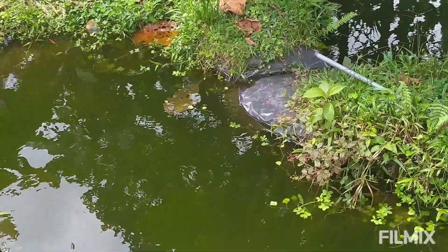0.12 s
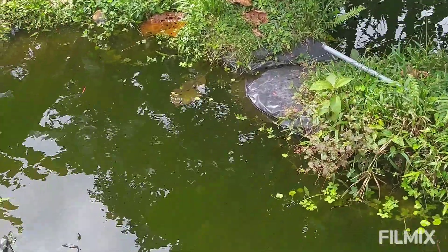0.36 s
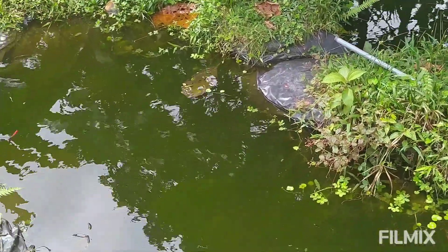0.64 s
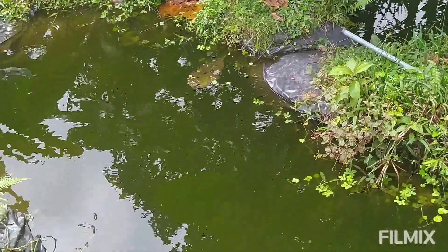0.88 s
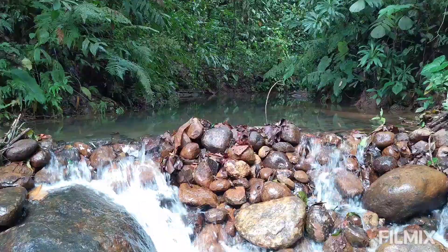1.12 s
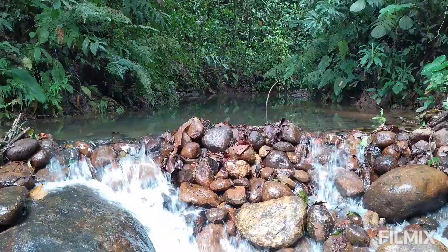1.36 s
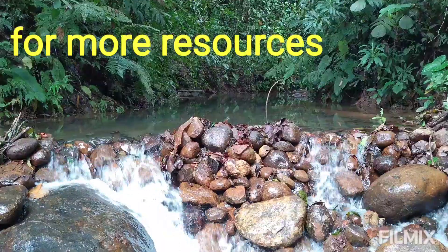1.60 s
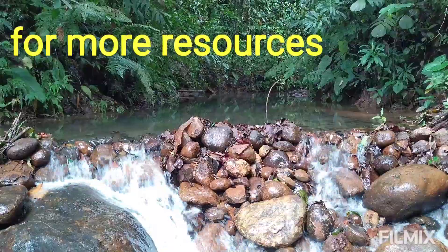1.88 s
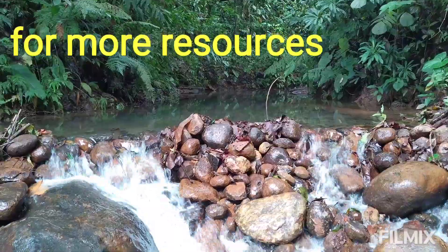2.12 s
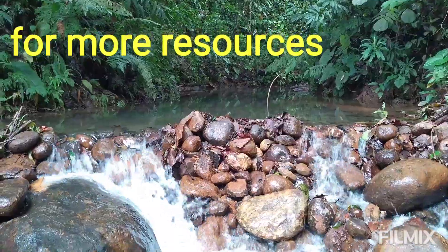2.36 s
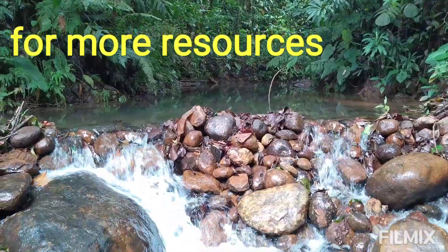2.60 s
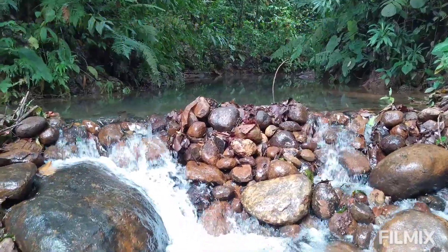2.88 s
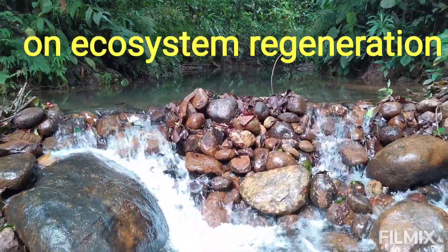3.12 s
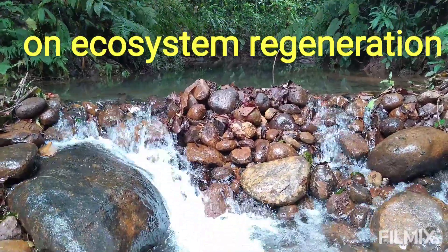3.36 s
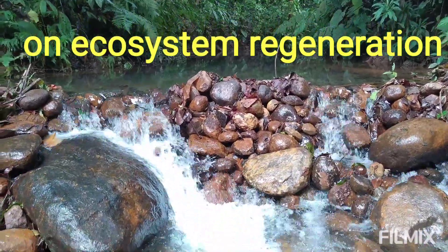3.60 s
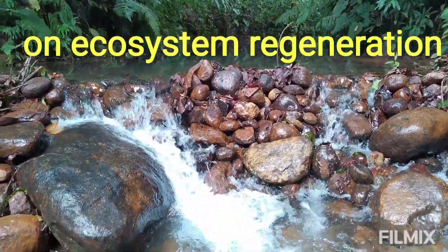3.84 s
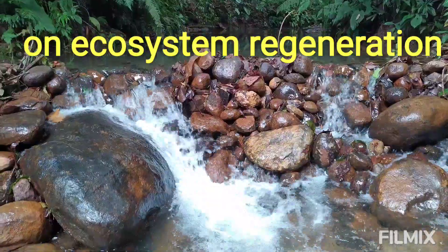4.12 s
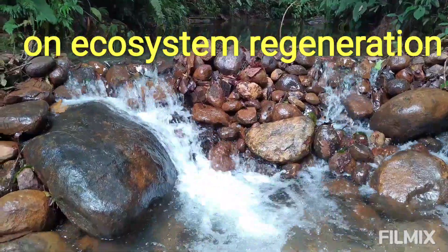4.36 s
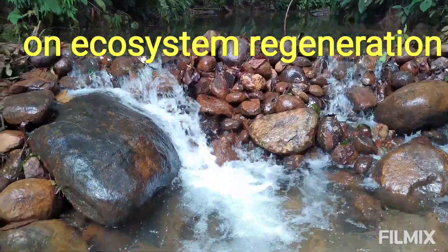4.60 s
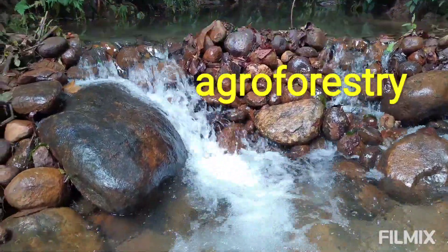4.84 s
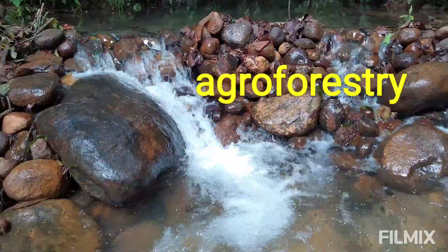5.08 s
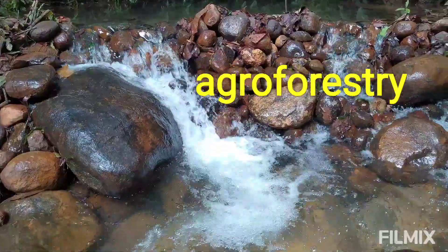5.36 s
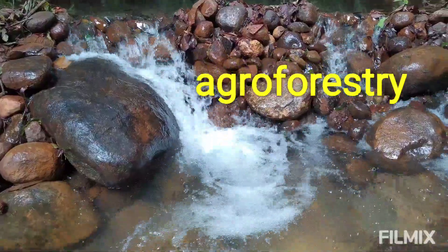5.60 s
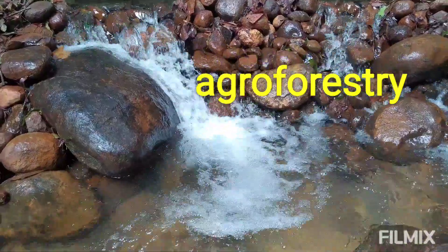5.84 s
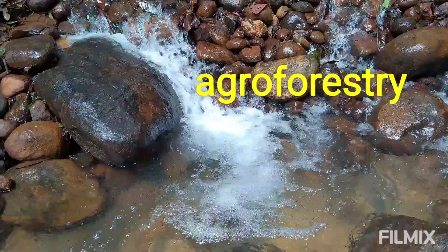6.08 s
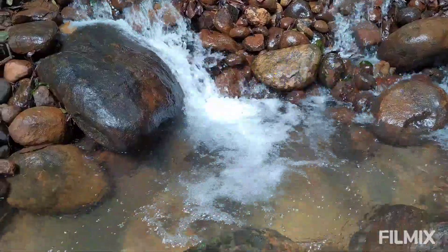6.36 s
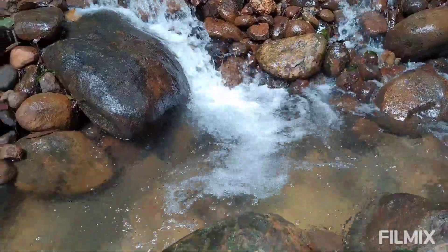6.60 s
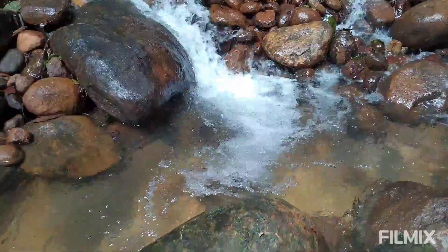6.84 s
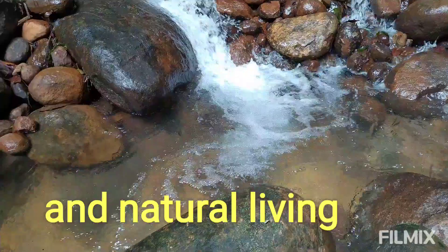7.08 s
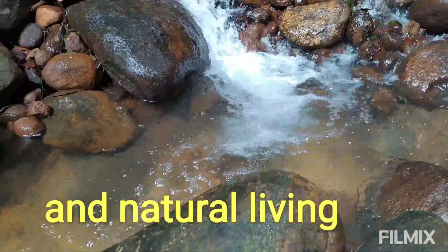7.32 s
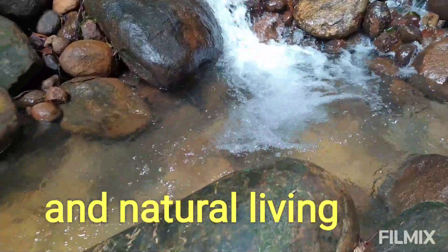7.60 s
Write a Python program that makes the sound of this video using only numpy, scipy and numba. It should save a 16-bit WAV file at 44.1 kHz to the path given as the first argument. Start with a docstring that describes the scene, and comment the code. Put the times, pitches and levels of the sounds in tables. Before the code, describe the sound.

Low gusty wind thumps fade away, a short gap follows, and a bright, splashing brook fades up and runs steadily with gurgling bubbles.

```python
"""Wind buffets two microphone ports beside a still pond and fades out; after a short silence
a shallow stream fades in, rushing over stones: a broad wash, bubbles in the plunge pool, fine spray.
Wind, faint air and wash are filtered noise that swells and flickers by chance.
Puffs, bubbles and spray drops are short dying sines whose pitch slides a little."""
import sys
import numpy as np
from scipy import signal
from scipy.fft import rfft, irfft, next_fast_len
from scipy.io import wavfile
from numba import njit

SR = 44100
rng = np.random.default_rng(int(sys.argv[2]) if len(sys.argv) > 2 else 0)


def unload_audio(sound):
    """Save the sound as a 16-bit wav file, at the path given as the first command line argument."""
    columns = np.transpose(np.atleast_2d(sound))
    # keep every value between -1 and 1, then stretch to whole-number steps
    steps = np.round(np.clip(columns, -1, 1) * 32767)
    wavfile.write(sys.argv[1], SR, steps.astype(np.int16))


def boost_factor(decibels):
    """Convert a level in decibels to a linear amplitude factor."""
    exponent = np.asarray(decibels, float) / 20
    return 10 ** exponent


N = 340011   # length in samples

# Tone of the wind. Each row: pitch in Hz, relative level in dB per Hz.
WIND_COLOUR = [(8.8, -29), (15, 7.5), (80, 2), (258, -11), (356, -21), (418, -31), (541, -32), (700, -44),
               (910, -73), (1540, -120)]
# Gusts, before the fade. Each row: middle in seconds, rumble level in dB, half length in seconds,
# left against right in dB.
GUSTS = [(0.013, -33.5, 0.035, 4), (0.102, -33.5, 0.018, -9), (0.197, -32, 0.015, -16),
         (0.27, -43, 0.0097, -10), (0.402, -37.5, 0.031, 1), (0.56, -33.5, 0.038, 2),
         (0.68, -42.5, 0.03, -5), (0.857, -38, 0.027, -4)]
# Sudden puffs, mostly on one port. Each row: start in seconds, strength in dB, starting pitch in Hz,
# left against right in dB.
PUFFS = [(0.095, -42, 178, -10.5), (0.187, -24.5, 270, -16), (0.37, -39, 167, 11), (0.495, -40, 186, -16.5),
         (0.544, -37, 151, 1.0), (0.835, -44.5, 188, -18), (1.044, -53, 186, -19)]
# Tone of the faint air by the pond. Each row: pitch in Hz, relative level in dB per Hz.
AIR_COLOUR = [(240, -41), (400, -25), (539, -16), (683, -16), (893, -18), (1850, -18), (2530, -17.5),
              (2770, -21), (6460, -26.5), (9090, -17.5), (14000, -31)]
# Tone of the stream's wash. Each row: pitch in Hz, relative level in dB per Hz.
WASH_COLOUR = [(15, -61), (25, -30.5), (101, -22.5), (165, -4), (447, -6.5), (525, -0.5), (771, -4.5),
               (886, -1), (1110, -5.5), (1280, -3.5), (1500, -6.5), (2190, -6.5), (2780, -9.5),
               (3020, -14.5), (3560, -15.5), (5620, -11.5), (7560, -15), (9640, -5.5), (11300, -8.5),
               (12500, -19.5), (15600, -31.5)]
# How wide the wash is. Each row: pitch in Hz, side against middle in dB.
WASH_WIDTH = [(60, 0), (110, -11), (200, -16.5), (380, -8.5), (700, -7.5), (1290, -1), (2380, -0.5),
              (4400, 0), (8120, 0.5), (15000, 1)]
# Which way the wash leans, before the turn. Each row: pitch in Hz, left against right in dB.
WASH_LEAN = [(60, -1), (110, -0.5), (200, 0.0), (380, -0.5), (700, -0.5), (1290, -2.5), (2380, 1.5),
             (4400, 0), (8120, -6.5), (15000, 10)]
# The microphones tilt down and turn to the pool. Each row: time in seconds, spray level in dB,
# left against right in dB.
TURN = [(1.3, 0.5, -0.2), (4.0, 0, -0.4), (6.0, 0.0, 0.0), (7.7, -2.0, 0.5)]
# The biggest bubbles, before the fade-in. Each row: start in seconds, strength in dB,
# starting pitch in Hz.
GULPS = [(2.027, -21, 977), (2.217, -20, 538), (3.359, -21, 594), (3.545, -23, 950), (4.104, -17.5, 397),
         (4.249, -18, 590), (4.507, -22, 800), (4.721, -20.5, 533), (5.018, -22.5, 544), (5.338, -22, 493),
         (6.395, -19, 1030), (7.012, -22, 624), (7.295, -22, 923), (7.444, -22, 686)]


def rms_one(x):
    """Scales a sound to an average power of 1."""
    return x / np.sqrt(np.mean(x ** 2) + 1e-20)


def sides(pan_db):
    """Left and right gains that differ by pan_db, half of it on each side."""
    return boost_factor(np.array([pan_db / 2, -pan_db / 2]))


def ramp(from_s, to_s):
    """Gain that rises from 0 to 1 in a straight line."""
    return np.interp(np.arange(N) / SR, [from_s, to_s], [0, 1])


def coloured(x, curve):
    """Filters a sound by a curve of (Hz, dB), read evenly in octaves."""
    size = next_fast_len(N)
    log_hz = np.log(np.arange(size // 2 + 1) * SR / size + 1)
    hz, db = np.transpose(curve)
    gain = boost_factor(np.interp(log_hz, np.log(hz), db))
    return irfft(rfft(x, size) * gain, size)[..., :N]


def drift(rate_hz):
    """Slow chance wandering with spread 1: noise smoothed twice, each time above rate_hz."""
    hop = 40   # samples between the points that are drawn
    r = np.exp(-2 * np.pi * rate_hz * hop / SR)
    noise = rng.standard_normal(N // hop + 2002)
    slow = signal.lfilter([1], [1, -2 * r, r * r], noise)[2000:]   # skip the settling
    slow = rms_one(slow - slow.mean())
    return np.interp(np.arange(N) / hop, np.arange(len(slow)), slow)


def patchy_noise(shared_db, own_db, fast_db):
    """Two white noises whose half-octave bands swell together, swell alone, and flicker."""
    size = next_fast_len(N)
    white = rfft(rng.standard_normal((2, size)))
    hz = np.arange(size // 2 + 1) * SR / size
    place = np.clip(2 * np.log2(hz / 40 + 1e-9), 0, 17)   # half octaves above 40 Hz
    together = drift(6.0)
    out = 0
    for k in range(18):
        overlap = np.clip(1 - abs(place - k), 0, 1)
        band = irfft(white * overlap, size)[:, :N]
        swell_db = shared_db * together + own_db * drift(3.6) + fast_db * drift(33.0)
        out = out + band * boost_factor(swell_db)
    return rms_one(out)


@njit
def add_rings(out, at, step, peak, cycles, rise):
    """Adds dying sines: the pitch climbs if rise is above 0 and sinks if it is below."""
    for k in range(len(at)):
        span = cycles[k] / step[k]   # samples in which the dying factor falls to 1/e
        for i in range(min(int(5 * span), out.shape[1] - at[k])):
            u = i / span
            sine = np.sin(2 * np.pi * step[k] * i * (1 + rise[k] * u))
            v = sine * np.exp(-u) * min(1.0, 4 * u)   # soft start
            out[0, at[k] + i] += peak[0, k] * v
            out[1, at[k] + i] += peak[1, k] * v


def tabled(rows, cycles, rise, pan_db):
    """Listed events, each a short dying sine."""
    s, db, hz = np.transpose(rows)[:3]
    out = np.zeros((2, N))
    same = np.ones(len(s))
    peak = boost_factor(db) * sides(pan_db * same)
    add_rings(out, (s * SR).astype(np.int64), hz / SR, peak, cycles * same, rise * same)
    return out


def swarm(per_s, low_hz, high_hz, cycles, rise, spread_db, pan_db):
    """Rings at random times: pitches even in octaves, a few far louder than the rest; power 1."""
    when, pitch, loudness, place, length = rng.random((5, int(per_s * N / SR)))
    hz = low_hz * (high_hz / low_hz) ** pitch
    peak = boost_factor(-spread_db * np.log(loudness + 0.0011)) * sides(pan_db * (2 * place - 1))
    out = np.zeros((2, N))
    # longer rings also climb faster
    add_rings(out, (when * N).astype(np.int64), hz / SR, peak, cycles * (0.5 + length), rise * length)
    return rms_one(out)


def wind():
    """Lumpy rumble of its own in each port: a steady breeze plus bell-shaped gusts."""
    s = np.arange(N) / SR
    level = boost_factor(-47)   # the steady breeze
    for at, db, half_s, pan_db in GUSTS:
        bell = np.exp(-0.5 * ((s - at) / half_s) ** 2)
        level = level + boost_factor(db) * sides(pan_db)[:, None] * bell
    lumps = boost_factor(3.0 * np.array([drift(25.4), drift(25.0)]))
    rumble = coloured(rng.standard_normal((2, N)), WIND_COLOUR)
    return level * rms_one(rumble * lumps)


def air():
    """Leaves and far water: faint patchy noise that slowly sinks."""
    s = np.arange(N) / SR
    hiss = rms_one(coloured(patchy_noise(shared_db=1.0, own_db=0.5, fast_db=1.0), AIR_COLOUR))
    return hiss * boost_factor(-53 - 2 * s)   # sinks by 2 dB each second


def puffs():
    """Sudden puffs of wind: low thumps that die quickly while their pitch sinks."""
    return tabled(PUFFS, cycles=1.4, rise=-0.04, pan_db=np.array(PUFFS)[:, 3])


def pond():
    """Wind and faint air fade out together; the puffs keep their strength."""
    fade_out = 1 - ramp(from_s=0.13, to_s=1.19)
    return fade_out * (wind() + air()) + puffs()


def wash():
    """Countless small bubbles blend into noise, wider in the treble."""
    mid, side = coloured(patchy_noise(shared_db=0.42, own_db=0.65, fast_db=1.59), WASH_COLOUR)
    side = coloured(side, WASH_WIDTH)
    half_lean = np.array(WASH_LEAN) * [1, 0.5]
    left = coloured(mid + side, half_lean)
    right = coloured(mid - side, half_lean * [1, -1])
    return np.array([left, right]) / np.std(mid)


def bubbles():
    """Bubbles in the plunge pool: each rings, its pitch climbing as it nears the surface."""
    return boost_factor(-13.0) * swarm(per_s=260.0, low_hz=319.3, high_hz=1500, cycles=4.24, rise=0.0407,
                              spread_db=3.5, pan_db=4.0)


def drops():
    """Fine spray drops: tiny high rings spread from left to right."""
    return boost_factor(-11.5) * swarm(per_s=900.0, low_hz=8420, high_hz=11500, cycles=7.0, rise=0.015,
                              spread_db=3.0, pan_db=14.5)


def gulps():
    """The biggest bubbles, ringing with a climbing pitch a little to the right."""
    return tabled(GULPS, cycles=5.3, rise=0.034, pan_db=-3.0)


def stream():
    """Wash, bubbles and spray follow the turning microphones; the gulps are added on top."""
    turn_s, turn_spray_db, turn_pan_db = np.transpose(TURN)
    s = np.arange(N) / SR
    spray_db = np.interp(s, turn_s, turn_spray_db)
    pan_db = np.interp(s, turn_s, turn_pan_db)
    whole = wash()
    low_pass = signal.butter(2, 4700, fs=SR, output="sos")   # spray lies above about 4700 Hz
    low = signal.sosfiltfilt(low_pass, whole)
    spray = boost_factor(spray_db) * (whole - low + drops())
    water = boost_factor(-26.0) * sides(pan_db) * (low + bubbles() + spray)
    return ramp(from_s=1.144, to_s=2.13) * (water + gulps())


def scene():
    """The pond until its cut, silence, then the stream."""
    pond_end_s, stream_start_s = 1.098, 1.2955
    s = np.arange(N) / SR
    pond_gate = np.clip((pond_end_s - s) / 0.012, 0, 1)   # closes in 12 ms
    stream_gate = np.clip((s - stream_start_s) / 0.0036, 0, 1)   # opens in 3.6 ms
    return pond() * pond_gate + stream() * stream_gate


def top_cut(x):
    """Nothing passes above the cut-off."""
    return signal.sosfilt(signal.butter(12, 15800, fs=SR, output="sos"), x)


def record(dry):
    """Turns the finished mix into the sound that is saved."""
    return top_cut(dry)


dry = scene()
out = record(dry)
unload_audio(out)
```